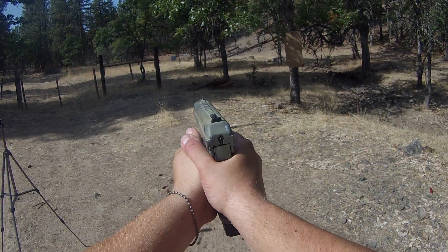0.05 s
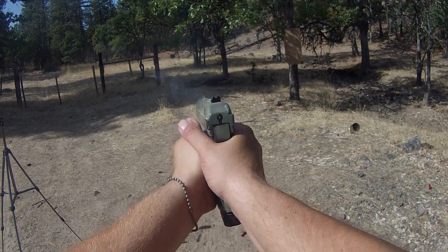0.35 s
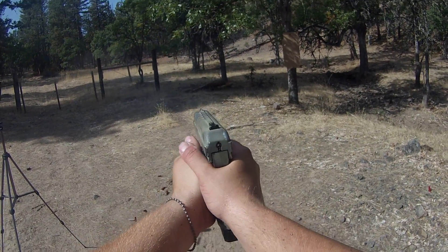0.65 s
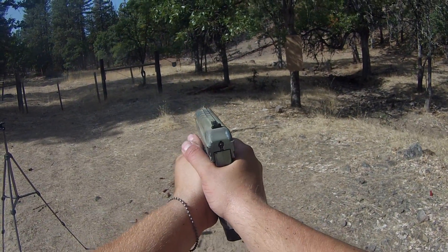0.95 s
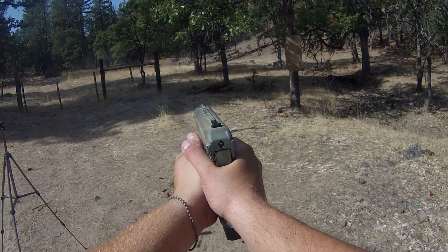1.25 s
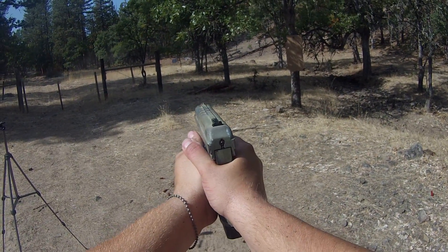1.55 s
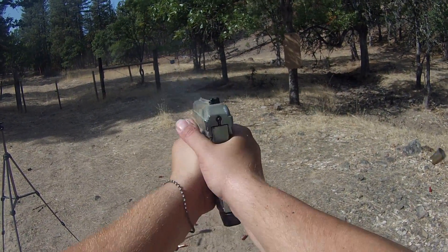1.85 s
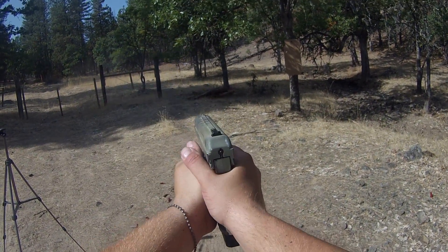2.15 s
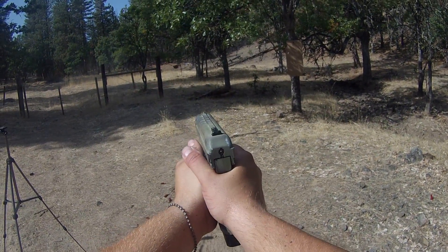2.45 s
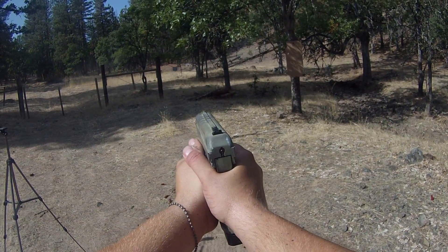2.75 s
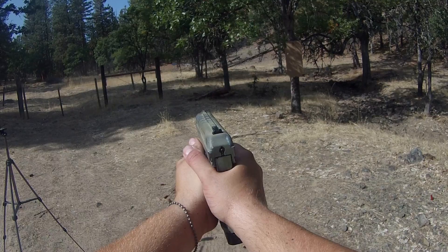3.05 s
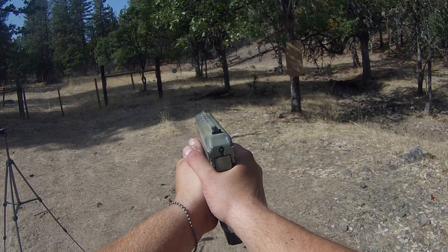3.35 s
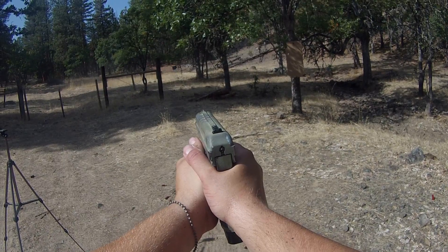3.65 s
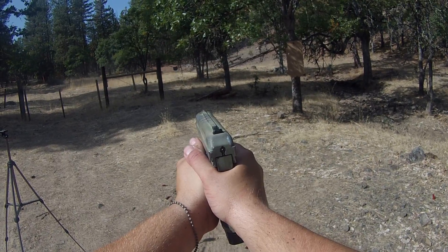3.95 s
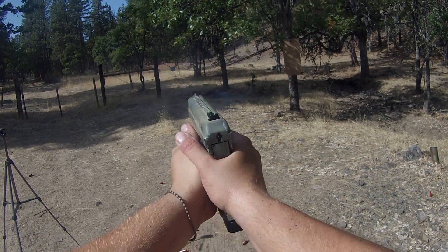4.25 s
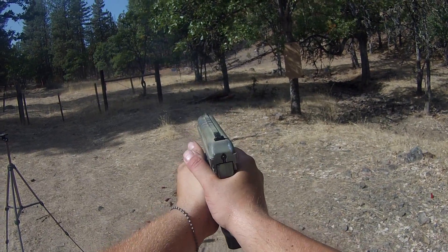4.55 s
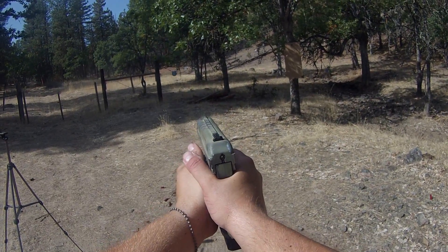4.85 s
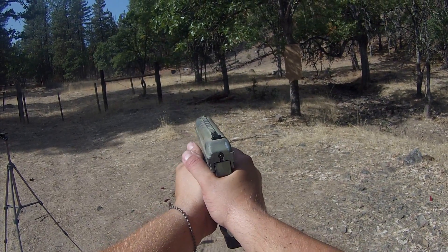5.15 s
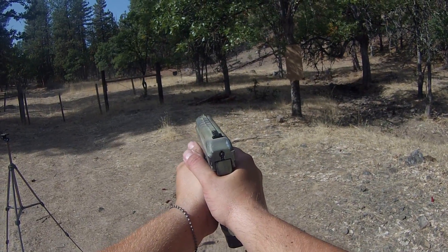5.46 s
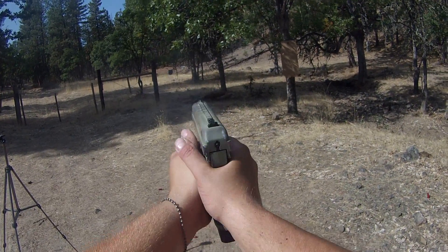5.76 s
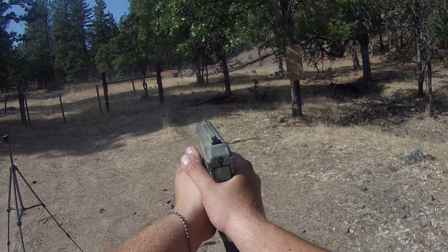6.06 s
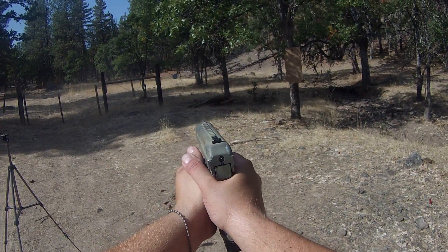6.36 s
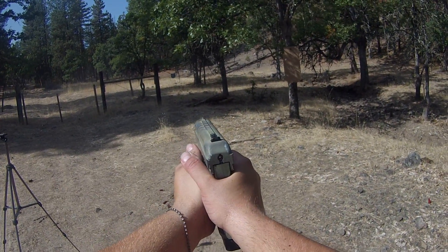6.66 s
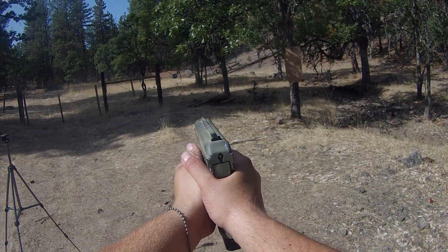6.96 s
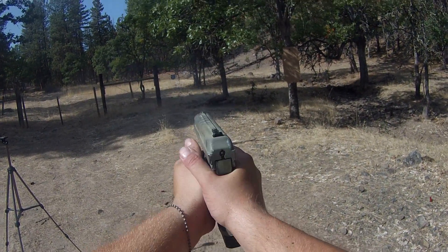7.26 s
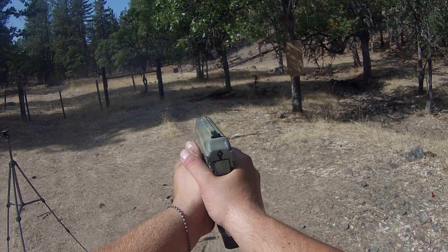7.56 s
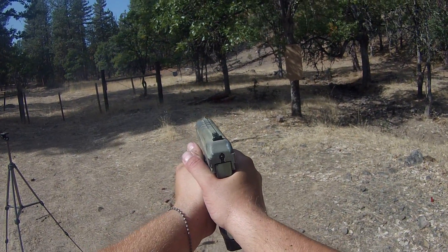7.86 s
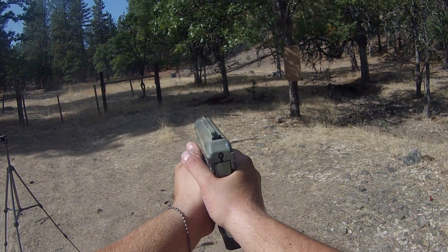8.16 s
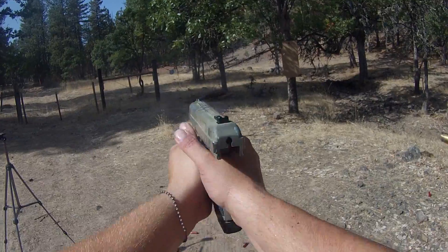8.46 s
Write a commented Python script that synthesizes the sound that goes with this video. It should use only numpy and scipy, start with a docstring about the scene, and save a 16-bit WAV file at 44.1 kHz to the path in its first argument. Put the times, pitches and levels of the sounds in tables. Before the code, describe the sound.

A pistol cracks six times up close outdoors, with short forest echoes, faint metallic rings and soft wind on the microphone.

```python
"""Six pistol shots in a dry forest clearing, an arm's length from a head-worn microphone.
Each blast rings the microphone housing and overloads it; the ground answers at once, then the
surrounding trees and a wooded hillside. Close by, the steel slide and spent brass ring faintly
and the trigger clicks. Light wind rumbles on the microphone throughout."""
import sys
import numpy as np
from scipy import signal
from scipy.fft import rfft, irfft, next_fast_len
from scipy.io import wavfile
from scipy.ndimage import map_coordinates

SR = 44100
rng = np.random.default_rng(int(sys.argv[2]) if len(sys.argv) > 2 else 0)


def wav_record(signal):
    """Record a signal, one row per channel, as 16-bit PCM in the file named by sys.argv[1]."""
    frames = np.transpose(np.atleast_2d(signal))
    bounded = np.clip(frames, -1, 1)
    # unit amplitude maps onto the largest positive 16-bit level
    quanta = np.round(bounded * 32767).astype(np.int16)
    wavfile.write(sys.argv[1], SR, quanta)


N = 384540

# Wind on the microphone; distant trees and hiss. Each row: frequency in Hz, relative level in dB.
WIND_SPECTRUM = [(10, -5.5), (22, 2.5), (38, 0.5), (50, -4.5), (70, -15.5), (100, -22.5), (150, -32),
                 (400, -61)]
HUSH_SPECTRUM = [(60, -5.5), (140, 0), (260, -2.5), (500, -8.5), (1000, -11.5), (2000, -16.5),
                 (4000, -22.5), (8000, -30), (13000, -36.5), (15500, -49)]
# The shots. Each row: start in seconds, overall gain in dB, relative gas push in dB,
# push length in seconds, relative gas turbulence in dB.
PISTOL_SHOTS = [(0.3283, -1.5, 5, 0.0047, -0.5), (1.8459, 0.5, 1, 0.0038, -4),
                (4.263, -4.5, 5.5, 0.0037, 9), (5.6793, -1.5, 3.5, 0.0049, -1),
                (7.128, -3, 10, 0.00053, 2.5), (8.4769, -2.5, 8, 0.0033, 1)]
# Housing resonances, swelling and dying as the gas sweeps past. Each row: frequency in Hz,
# relative level in dB, time to the crest in seconds, half length in seconds.
HOUSING_MODES = [(530, -4.5, 0.0036, 0.0022), (640, 3, .0018, 0.0011), (863, -2.5, 0.0028, 0.0032),
                 (1354, -4, 0.0038, 0.003), (1482, 7, .0028, 0.0021), (2045.5, 10, .0051, 0.0019),
                 (2290, 4.5, .0057, 0.00087), (3374, -1, 0.00027, 0.0037), (6471, -0.5, 0.0037, 0.0012)]
# Muzzle gas; scatter off rough soil; the forest echo. Each row: frequency in Hz, relative level in dB.
GAS_SPECTRUM = [(100, -7.5), (600, 1), (2000, -1.5), (3600, -0.5), (6500, -11.5), (10000, -15.5),
                (15000, -30)]
GROUND_SPECTRUM = [(100, -18.5), (700, -7), (1500, 1.5), (2200, -2), (3500, -10), (6500, -17), (12000, -39)]
FOREST_SPECTRUM = [(80, -24), (200, -17.5), (350, -15), (550, -9.5), (900, -3), (1150, -3.5), (1450, -4),
                   (2300, -7.5), (3400, -14.5), (4400, -21), (6500, -22), (8000, -35), (11000, -43),
                   (14000, -59)]
# Peaks and dips in the tone of the forest echo. Each row: centre in Hz, width in Hz, boost or cut in dB.
ECHO_PEAKS = [(1134, 130, -3), (1317, 160, 5.5), (1484, 120, 5.5), (1840, 180, -5), (2110, 250, 4.5),
              (2620, 110, 3.5), (2680, 200, -4), (3455, 270, 2), (4000, 150, 4.5), (6260, 2400, 2.5),
              (10800, 600, 3.5)]
# How the echo changes with distance. Each row: frequency in Hz, change in dB per second of delay.
PATH_SLOPES = [(200, 5.5), (700, 6.5), (1400, 0.5), (2200, -5), (3500, -9), (4600, -25.5), (6400, -29.5),
               (8500, -56.5), (14000, -74)]
# The steel slide. Each row: frequency in Hz, level in dB, seconds to fall 60 dB.
SLIDE_MODES = [(4540, -58.5, 0.7), (4980, -63, .9), (5385, -63, 1.2), (5970, -59.5, 1.5), (7930, -68, .45)]
# Spent brass. Each row: start in seconds, pitch in Hz, level in dB, overtone in dB, life in seconds.
BRASS_CASES = [(0.41, 5380, -60, -66, .12), (1.93, 5365, -51, -72, .15), (5.77, 5420, -51, -67, .16),
               (8.562, 5395, -46, -76, .05)]
# Distinct echoes off the hillside. Each row: delay in seconds, level in dB.
HILL_ECHOES = [(.207, -28.5), (.226, -31.5), (.28, -36), (.328, -35)]
# The colour of a distinct echo. Each row: frequency in Hz, relative level in dB.
SLAP_SPECTRUM = [(100, -16), (300, -5.5), (600, 3.5), (1400, -2), (2500, -7), (5000, -22), (12000, -59.5)]
# Trigger clicks. Each row: start in seconds, gain in dB.
TRIGGER_RESETS = [(1.9296, -41), (5.762, -45), (7.22, -41), (8.56, -38.5)]
# The trigger's ring. Each row: frequency in Hz, relative level in dB, seconds to fall 60 dB.
TRIGGER_MODES = [(2060, 7, 0.025), (5500, -3, .02), (6740, 0.5, 0.013), (7150, -5, .012),
                 (10900, -18, 0.026), (14600, -27, .04)]
# The slight stereo width. Each row: frequency in Hz, side level against the middle in dB.
SIDE_SPECTRUM = [(60, -41.5), (250, -41), (500, -37.5), (2000, -42), (4000, -34.5), (8000, -33.5),
                 (12000, -24.5)]

GROUND_DELAY_S = 0.0088
NEAR_DB = -37.5  # steady return from the trees around the clearing
HILL_S, HILL_DB, HILL_RISE_S = 0.22, -35, 0.1  # the echo swells as the sound reaches the hillside
SPREAD_DB_PER_DECADE, ABSORB_DB_PER_S = 10, 26.5  # beyond it the echo fades with the path's length


def amp(db):
    """Decibels to gain."""
    return 10 ** (np.asarray(db) / 20)


def unit(x):
    """Scale to rms 1."""
    return x / np.sqrt(np.mean(x ** 2) + 1e-20)


def along(points, hz):
    """(Hz, value) points read on a log axis."""
    f, v = np.transpose(points)
    return np.interp(np.log(hz + 1), np.log(f + 1), v)


def filtered(x, response):
    """Filter x by a complex response of frequency."""
    n = x.shape[-1]
    m = next_fast_len(n + SR // 4)
    return irfft(rfft(x, m) * response(np.fft.rfftfreq(m, 1 / SR)), m)[..., :n]


def noise(spectrum, size):
    """Coloured noise of rms 1."""
    return unit(filtered(rng.standard_normal(size), lambda hz: amp(along(spectrum, hz))))


def wobble(rate):
    """A smooth random curve, rate knots a second."""
    return map_coordinates(rng.standard_normal(int(N * rate / SR) + 4), [np.arange(N) * rate / SR])


def ring(modes, t, scatter_db):
    """Damped modes struck at t = 0, at new strengths each time."""
    return sum(amp(db + scatter_db * rng.standard_normal())
               * np.exp(-np.log(1000) * t / t60) * np.sin(2 * np.pi * hz * t) for hz, db, t60 in modes)


def add(track, start, sound):
    """Mix a sound into the track, start seconds in."""
    part = track[round(start * SR):][:len(sound)]
    part += sound[:len(part)]


def wind(buffet_db=-38, gust_db=1.2):
    """Light air buffets the microphone in random gusts, over the hush of distant trees."""
    buffet = amp(buffet_db + gust_db * wobble(rate=5)) * noise(WIND_SPECTRUM, N)
    return buffet + amp(-58) * noise(HUSH_SPECTRUM, N)


def blast_wave(t, length):
    """Sudden overpressure, then a longer suction."""
    return (1 - t / length) * np.exp(-t / length)


def blasts():
    """At arm's length, the muzzle wave and its turbulent gas hit the housing; the ground answers."""
    out, t = np.zeros(N), np.arange(SR // 10) / SR
    front = 1 - np.exp(-t / 0.0005)
    for start, db, push_db, push_s, gas_db in PISTOL_SHOTS:
        push = amp(push_db) * blast_wave(t, push_s)
        gas = amp(gas_db + 9.5) * np.exp(-t / 0.002) * noise(GAS_SPECTRUM, len(t))
        add(out, start, -amp(db) * front * (push + gas + housing_ring(t)))
        add(out, start + GROUND_DELAY_S, -amp(db) * ground_bounce(t))
    return out


def housing_ring(t):
    """The microphone housing rings for a few milliseconds as the gas sweeps past."""
    return sum(amp(db + 0.58 * rng.standard_normal())
               * np.exp(-((t - crest) / half) ** 2) * np.sin(2 * np.pi * hz * t)
               for hz, db, crest, half in HOUSING_MODES)


def ground_bounce(t):
    """The ground underfoot returns a short sharp pulse, and its roughness a brief rattle."""
    front = 1 - np.exp(-(t / 0.00013) ** 2)
    crack = amp(11.5) * blast_wave(t, length=0.00026)
    rattle = amp(-6.5) * np.exp(-t / 0.0025) * noise(GROUND_SPECTRUM, len(t))
    return front * (crack + rattle)


def echo_db(delay):
    """Level of the echo: it holds, swells up to the hillside, then spreads and is absorbed."""
    swell = np.clip(1 + (delay - HILL_S) / HILL_RISE_S, 0, 1)
    far = np.maximum(delay, HILL_S)
    loss_db = SPREAD_DB_PER_DECADE * np.log10(far / HILL_S) + ABSORB_DB_PER_S * (far - HILL_S)
    return NEAR_DB + (HILL_DB - NEAR_DB) * swell - loss_db


def soil_db(hz, delay, dip_db=2.5, centre_hz=600, octaves=0.62):
    """Soft soil swallows the low middle of short, grazing paths; echoes from up the slope escape."""
    grazing = np.clip((HILL_S - delay) / HILL_RISE_S, 0, 1)
    return -dip_db * grazing * np.exp(-(np.log2((hz + 1) / centre_hz) / octaves) ** 2)


def echo_colour(hz):
    """Gain of the forest echo at each frequency."""
    peaks_db = sum(db / (1 + (2 * (hz - centre) / width) ** 2) for centre, width, db in ECHO_PEAKS)
    return amp(along(FOREST_SPECTRUM, hz) + peaks_db)


def forest_echo():
    """Countless trunks around the clearing scatter each shot; longer paths lose more treble."""
    out, t = np.zeros(N), np.arange(2 * SR) / SR
    neutral_s = 0.1362  # the delay at which the path leaves the colour unchanged
    for start, *_ in PISTOL_SHOTS:
        scatter = unit(filtered(rng.standard_normal(len(t)), echo_colour))
        hz, delay, bands = signal.stft(scatter, SR, nperseg=256)
        hz = hz[:, None]
        # trunks return the middle range in lumps; fine twigs return the treble smoothly
        lumps_db = 1.6 * rng.standard_normal(len(delay)) / (1 + (hz / 3000) ** 2)
        path_db = along(PATH_SLOPES, hz) * (delay - neutral_s) + soil_db(hz, delay)
        _, tail = signal.istft(bands * amp(lumps_db + path_db), SR, nperseg=256)
        add(out, start + GROUND_DELAY_S, amp(echo_db(t)) * tail[:len(t)])
    return out


def slide():
    """The steel slide slams shut after each shot and sings on faintly."""
    out, t = np.zeros(N), np.arange(SR) / SR
    for start, *_ in PISTOL_SHOTS:
        add(out, start + 0.03, ring(SLIDE_MODES, t, scatter_db=1.5))
    return out


def brass(overtone_ratio=1.633):
    """Spent cases ring faintly while they tumble through the air near the microphone."""
    out, t = np.zeros(N), np.arange(SR // 2) / SR
    for start, hz, db, overtone_db, life in BRASS_CASES:
        flight = (1 - np.exp(-t / 0.0087)) * np.exp(-(t / life) ** 2)
        tumble = 1 + 0.52 * np.sin(2 * np.pi * rng.uniform(26, 41.86) * t)
        phase = 2 * np.pi * hz * t
        tone = amp(db) * np.sin(phase) + amp(overtone_db) * np.sin(overtone_ratio * phase)
        add(out, start, flight * tumble * tone)
    return out


def far_slaps(trunks=7, trunks_from_s=0.49, gap_s=0.061):
    """The hillside, then single far trunks at random distances, slap back alike after every shot."""
    out, t = np.zeros(N), np.arange(SR // 10) / SR
    delays = trunks_from_s + gap_s * (np.arange(trunks) + rng.random(trunks))
    trunk_echoes = [(delay, echo_db(delay) + 0.5) for delay in delays]
    slap = np.exp(-t / 0.0049) * (1 - np.exp(-t / 0.00042))
    for start, *_ in PISTOL_SHOTS:
        for delay, db in HILL_ECHOES + trunk_echoes:
            add(out, start + delay, amp(db) * slap * noise(SLAP_SPECTRUM, len(t)))
    return out


def trigger():
    """The trigger snaps forward again as the recoil ends, heard after four of the shots."""
    out, t = np.zeros(N), np.arange(SR // 10) / SR
    for start, db in TRIGGER_RESETS:
        snap = amp(-7.5) * np.exp(-t / 0.0012) * rng.standard_normal(len(t))
        add(out, start, amp(db) * (ring(TRIGGER_MODES, t, scatter_db=6.0) + snap))
    return out


def scene():
    """The clearing from the shooter's head: one microphone feeds both channels."""
    mono = blasts() + forest_echo() + slide() + brass() + far_slaps() + trigger() + wind()
    return np.array([mono, mono])


def saturate(x, top, hardness):
    """Rounded clipping at the level top."""
    return x / (1 + np.abs(x / top) ** hardness) ** (1 / hardness)


def record(dry, coupling_hz=15, rolloff_hz=12500, top_hz=15200):
    """The microphone overloads, its coupling capacitor swings back, and the treble is cut."""
    overloaded = saturate(dry, top=1.02, hardness=3.8)
    coupled = filtered(
        overloaded, lambda hz: 1j * hz / (coupling_hz + 1j * hz) / (1 + (hz / rolloff_hz) ** 4))
    # left and right sit very slightly apart in phase and hiss
    side = filtered(coupled[0], lambda hz: 1j * amp(along(SIDE_SPECTRUM, hz)))
    side += amp(-80) * noise([(100, -1.5), (8000, -3.0), (14000, -25.5)], N)
    pair = np.clip(coupled + [side, -side], -1, 1)
    return filtered(pair, lambda hz: 1 / (1 + (hz / top_hz) ** 60))


dry = scene()
out = record(dry)
wav_record(out)
```